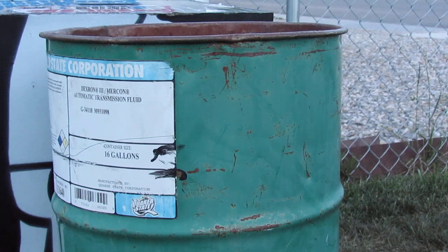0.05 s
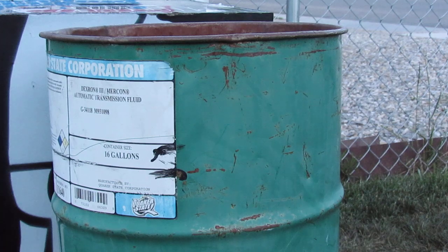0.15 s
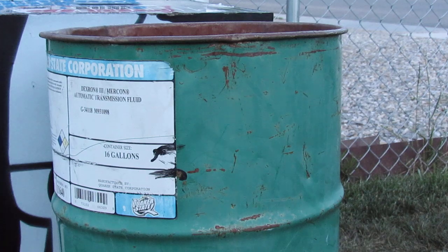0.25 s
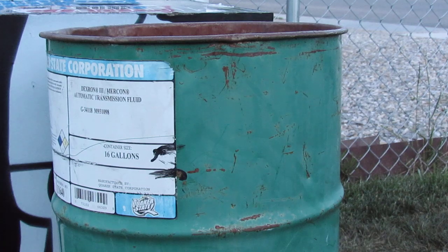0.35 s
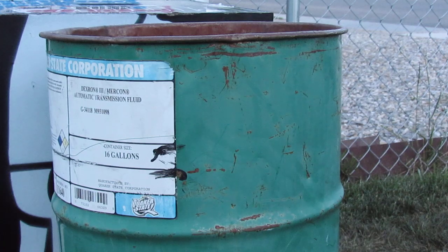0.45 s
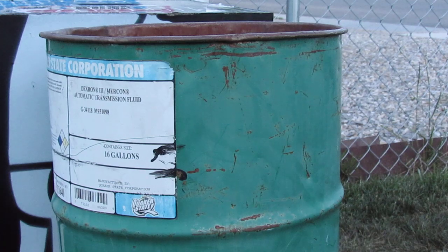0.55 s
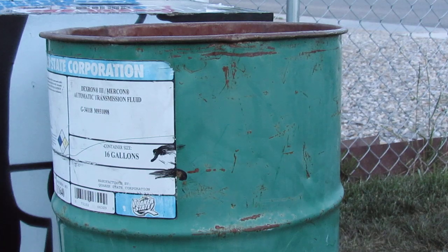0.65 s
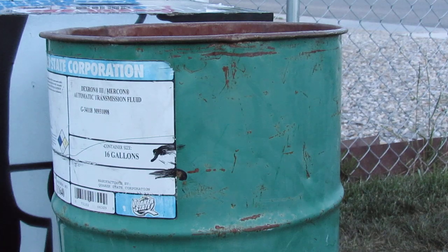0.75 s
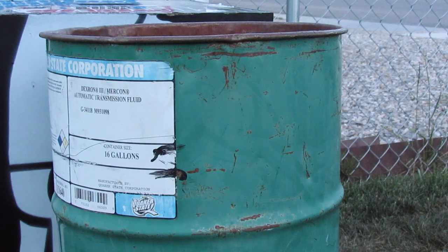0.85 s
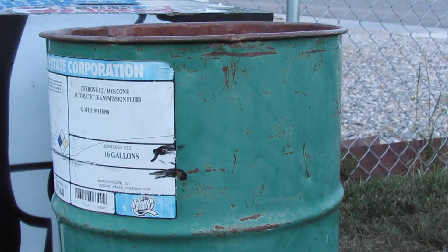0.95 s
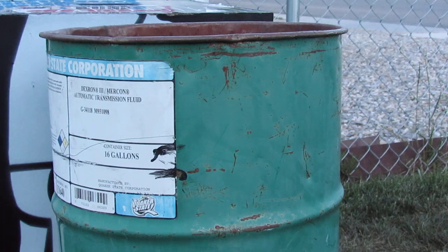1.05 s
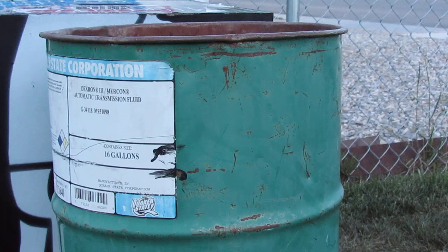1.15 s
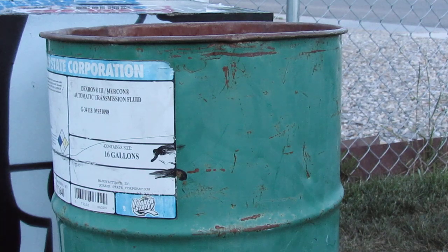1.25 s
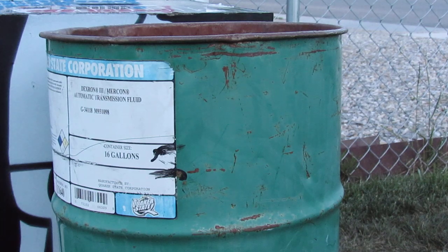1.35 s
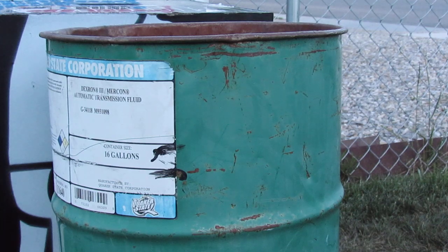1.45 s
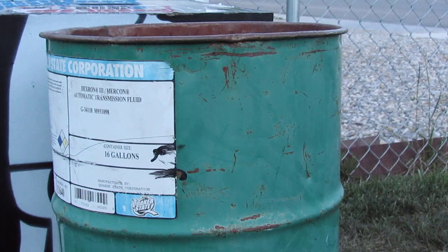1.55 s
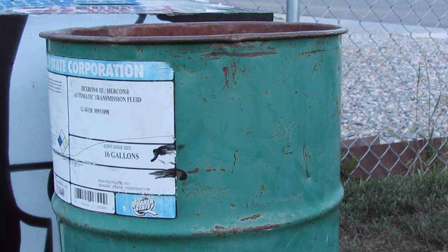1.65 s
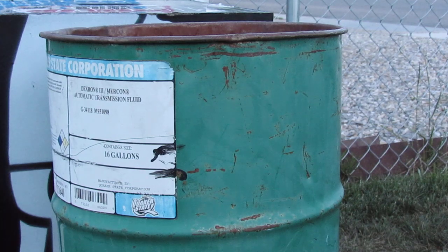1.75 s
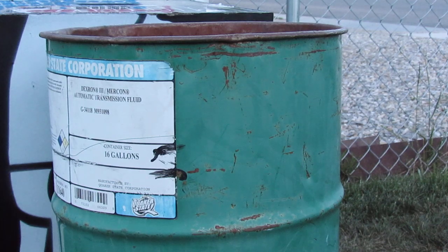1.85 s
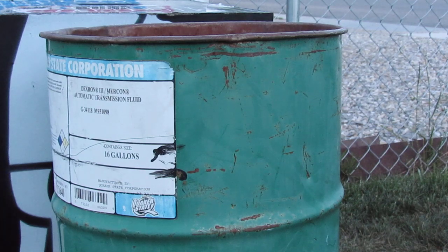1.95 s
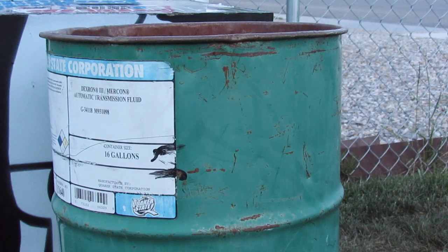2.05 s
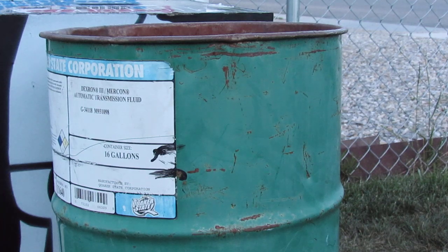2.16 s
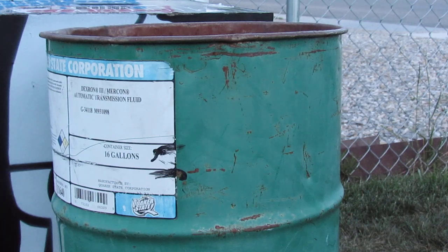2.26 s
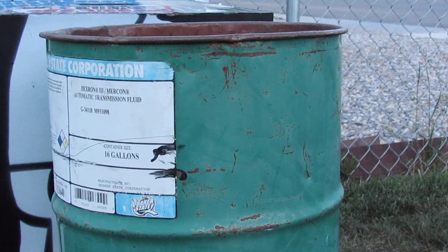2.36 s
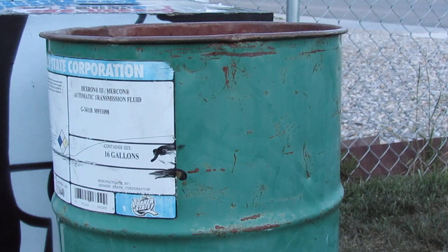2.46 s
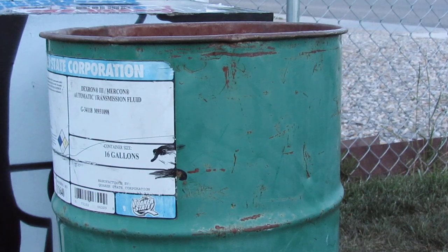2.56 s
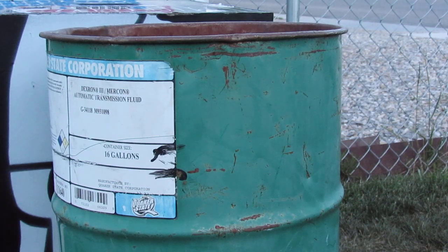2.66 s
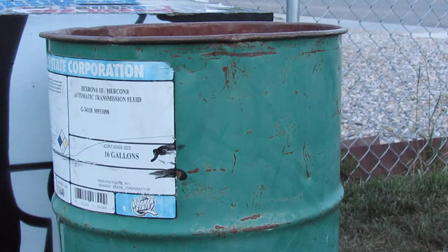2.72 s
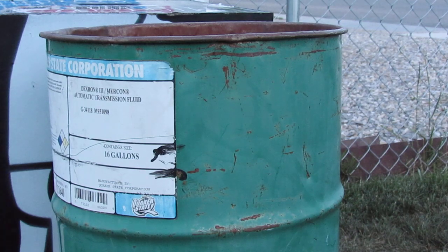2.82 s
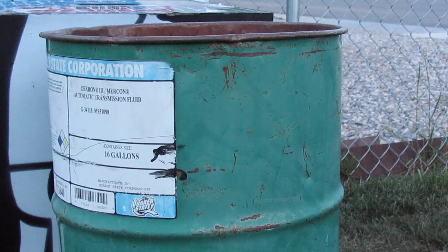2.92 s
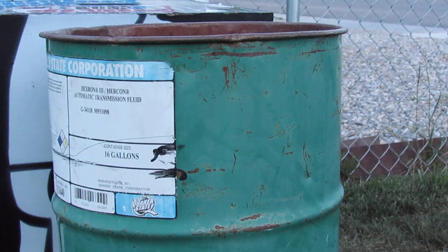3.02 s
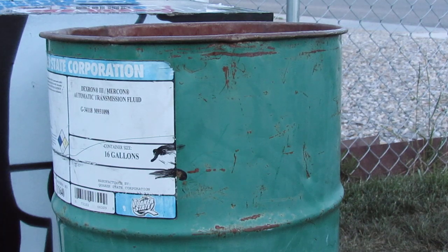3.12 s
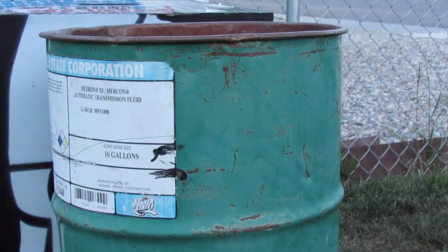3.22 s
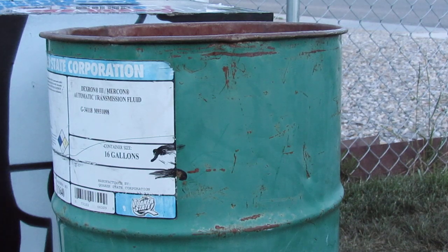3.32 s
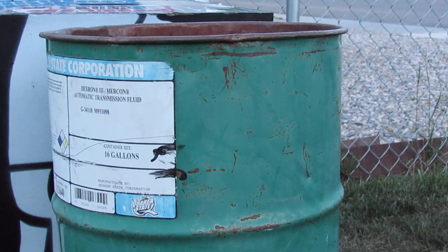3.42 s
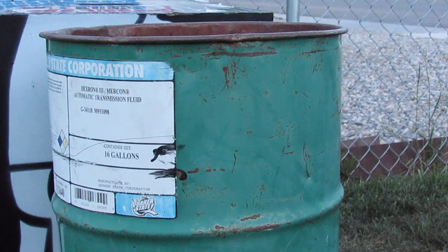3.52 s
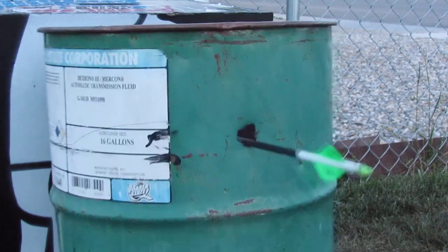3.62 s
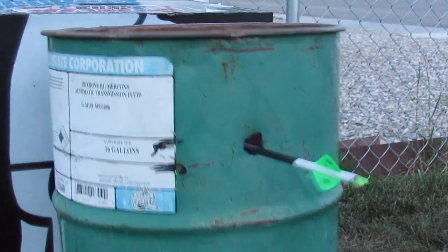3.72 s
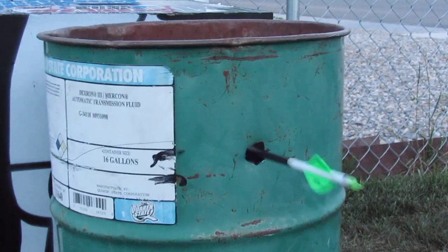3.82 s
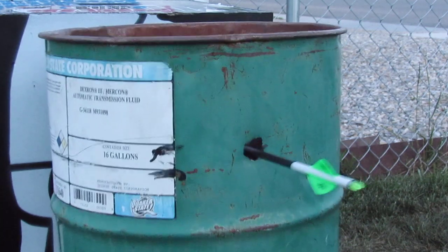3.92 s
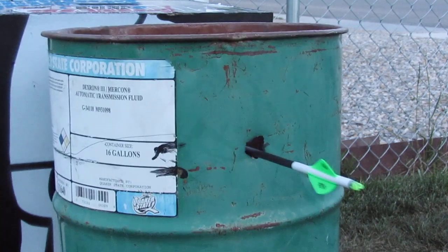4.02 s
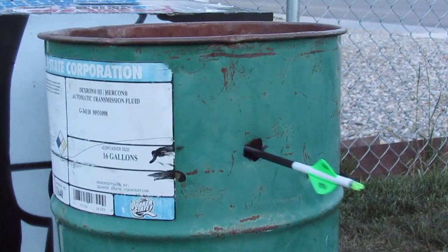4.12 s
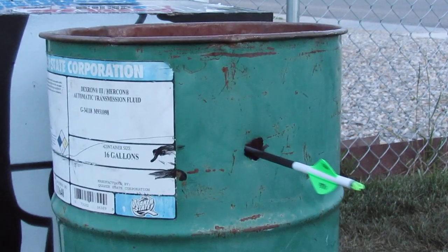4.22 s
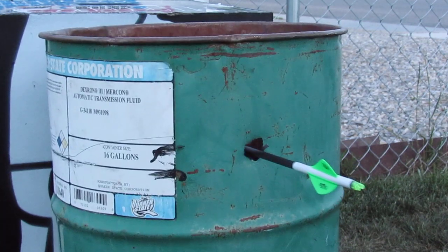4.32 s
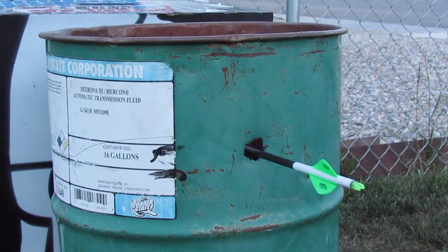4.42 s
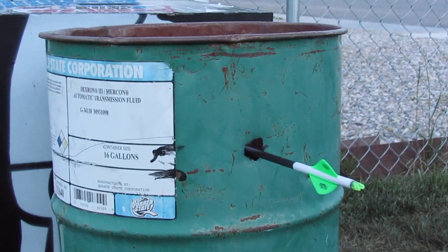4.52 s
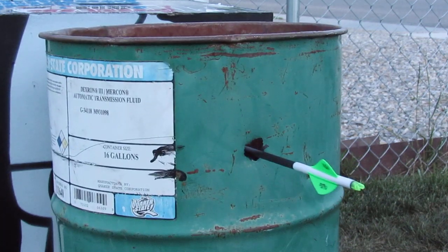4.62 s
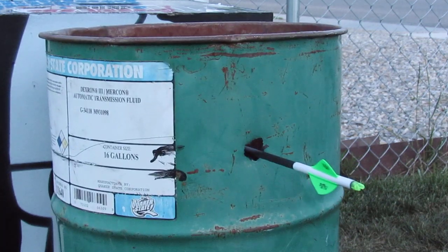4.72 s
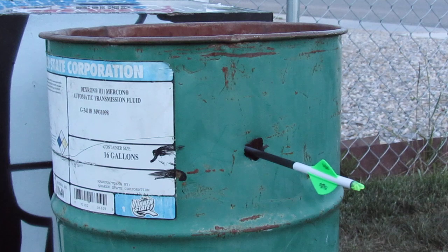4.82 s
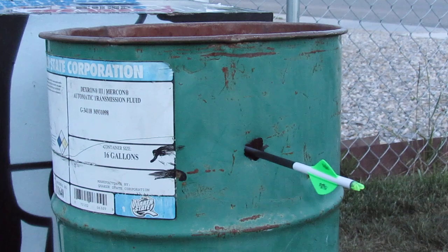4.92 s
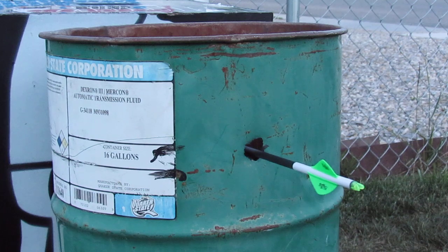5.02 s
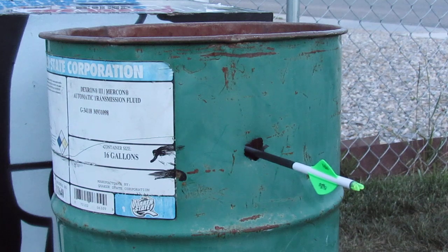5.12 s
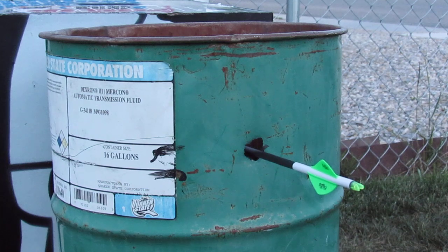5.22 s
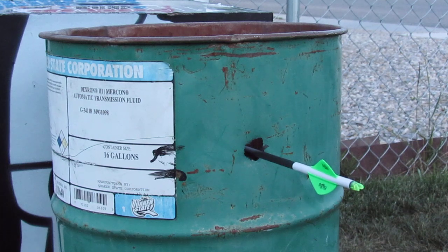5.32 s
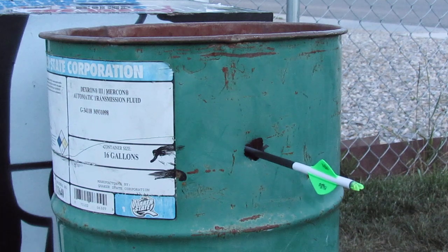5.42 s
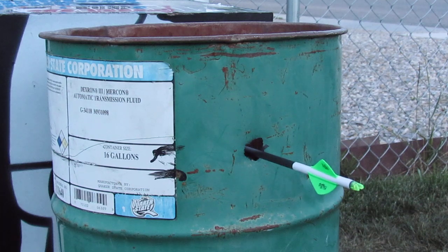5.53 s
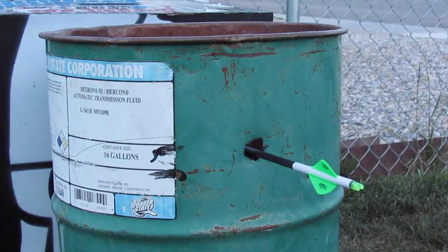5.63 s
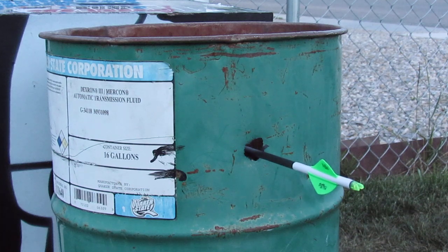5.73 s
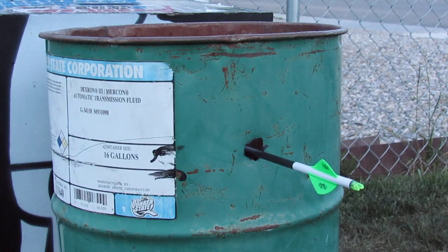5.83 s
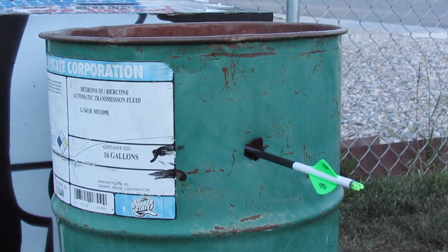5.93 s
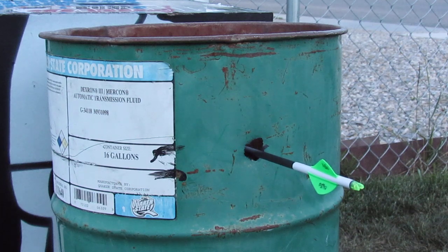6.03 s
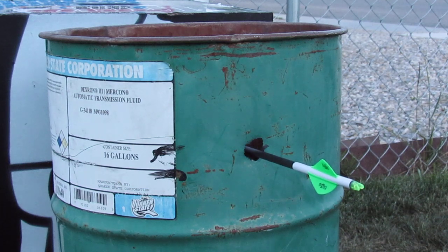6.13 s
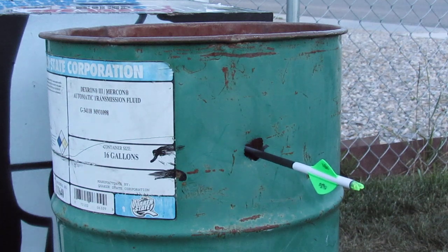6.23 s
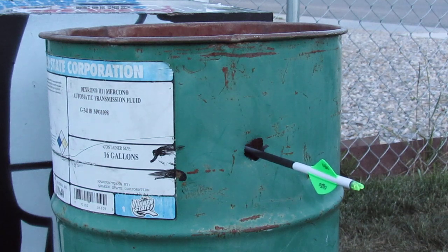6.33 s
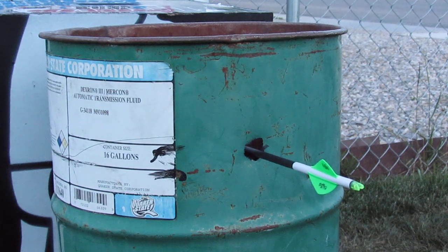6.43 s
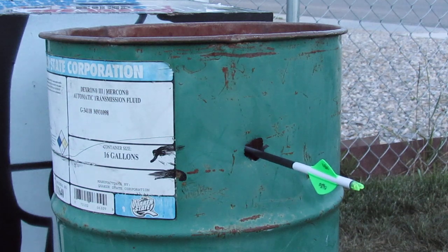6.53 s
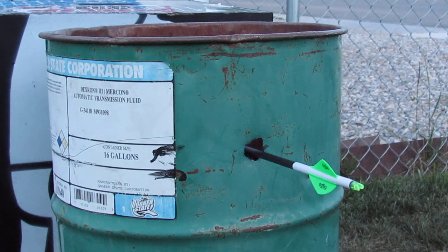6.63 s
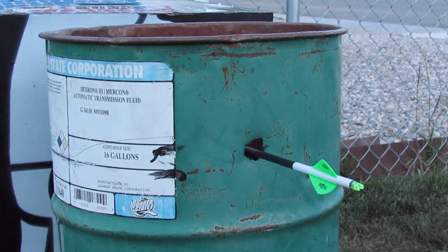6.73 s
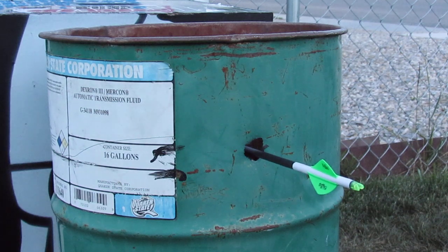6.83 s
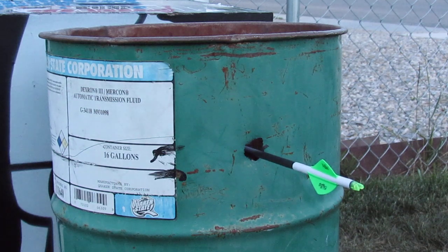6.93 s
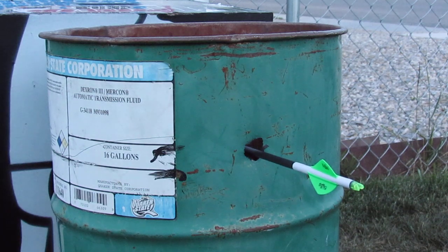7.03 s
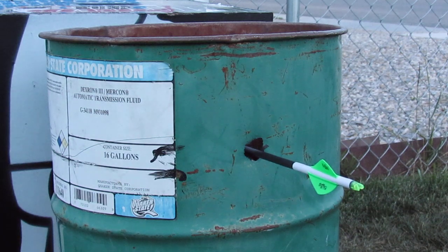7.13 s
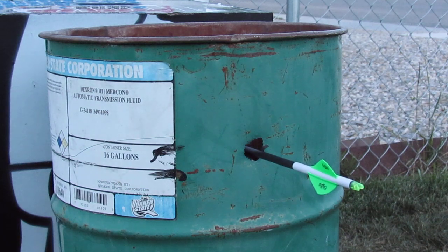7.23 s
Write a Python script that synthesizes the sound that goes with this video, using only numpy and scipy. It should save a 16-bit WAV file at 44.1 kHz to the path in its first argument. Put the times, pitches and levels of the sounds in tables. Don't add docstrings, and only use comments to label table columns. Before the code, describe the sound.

From 0 s a quiet outdoor yard: dull distant traffic and engine hum, a fast high cricket trill that gradually softens, and small high bird notes. A sharp rising whip call comes at 1.0 s, a thin buzzy call at 1.1-1.5 s, a louder, hoarser buzz at 1.8-2.2 s, then falling chirps. Small dry ticks at about 3 s. At 3.53 s a faint bow-release tick, then at 3.55 s an arrow bursts through an empty steel drum: an enormous bright, hollow bang, scrape and several rapid blows until 3.7 s. Echoes slap back to about 4.1 s while the metal rings in many clashing tones, treble dying first, low hum lingering past 5 s. The ambience is ducked, then creeps back: passing cars around 5 s, brief bird chirps at 5.5 s, a dull knock at 6.2 s, grass rustling closer with clicks until 7.3 s.

```python
import sys
import numpy as np
from scipy import signal
from scipy.io import wavfile

SR = 44100
rng = np.random.default_rng(int(sys.argv[2]) if len(sys.argv) > 2 else 0)


def to_linear_factor(level_db):
    exponent = np.asarray(level_db, float) / 20
    return 10 ** exponent


def materialize(psi):
    bounded = np.clip(np.atleast_2d(psi).T, -1, 1)
    quanta = np.round(bounded * 32767).astype(np.int16)
    wavfile.write(sys.argv[1], SR, quanta)


N = 320603

# frequency in Hz, density in dB per Hz.
TRAFFIC = [(15, -50), (25, -13.5), (59, -13.5), (80, 3), (140, -4), (204, -8), (260, -1.5), (340, -10),
           (649, -7.5), (763, -2.5), (1310, -4.5), (4760, -25.5), (6060, -17), (7120, -26), (15600, -31)]
# frequency in Hz, likeness from -1 to 1.
AIR_ALIKE = [(60, 0.94), (180, 0.93), (550, 0.88), (1650, 0.63), (4970, 0.13), (15000, 0.04)]
# time in seconds, lift in dB.
PASSES = [
    (.5, 0.9),
    (5.0, 3.9),
    (6.55, 2.2),
    (7.15, 2),
]
# frequency in Hz, width in Hz, level in dB.
MOTOR = [(100, 31, -64), (149, 20, -61), (202, 87, -75.5), (258, 120, -64)]
# time in seconds, level in dB.
CRICKET = [
    (0, -51.5),
    (1.2, -55.5),
    (2, -57),
    (2.5, -63),
    (5.2, -68.5),
    (6.2, -71.5),
    (7.27, -85),
]
# time in seconds, frequency in Hz.
CRICKET_HZ = [
    (0, 6050),
    (3.3, 5976),
    (4.2, 5740),
    (7.27, 5836),
]

# start in seconds, length in seconds, frequency in Hz, width in Hz, level in dB.
RASPS = [(.001, 0.22, 11300, 4000, -60), (.48, 0.23, 7350, 1300, -58.5), (1.25, 0.19, 3690, 400, -57.5),
         (1.035, .085, 5330, 650, -51), (1.085, .06, 9700, 1200, -60), (1.085, .09, 3610, 1200, -57),
         (5.59, .13, 7340, 500, -63), (3.075, .04, 8100, 400, -64), (3.072, 0.052, 4670, 1200, -54.5),
         (3.1, .1, 6500, 900, -62), (4.48, 0.048, 3870, 1620, -68.5), (4.485, .03, 7820, 902, -71),
         (4.54, 0.063, 6200, 902, -75), (5.495, 0.028, 2400, 1200, -59), (5.505, 0.067, 7600, 795, -58),
         (5.558, 0.075, 5300, 1300, -55), (5.585, .08, 6600, 1200, -59), (5.66, 0.24, 932, 40, -59.5),
         (6.285, 0.32, 2674, 2370, -63)]
# start in seconds, length in seconds, start in Hz, end in Hz, level in dB.
SLURS = [
    (.3, 0.31, 6500, 7600, -59),
    (2.854, 0.13, 1900, 2930, -58),
    (5.548, 0.036, 4600, 5960, -51),
    (5.572, .014, 5900, 7300, -56),
    (6.805, 0.037, 4300, 5070, -56.5),
]
# start in seconds, length in seconds, start in Hz, level in dB.
SEEPS = [
    (.96, .12, 9400, -59),
    (2.73, .06, 9900, -66),
    (2.819, 0.15, 9360, -57.5),
    (5.512, .045, 8800, -59),
]
# start in seconds, start in Hz, held note in Hz, level in dB.
WHIPS = [
    (1.022, 2900, 5700, -43),
    (5.577, 7750, 7430, -48),
]
# time in seconds, level in dB, frequency in Hz, hoarse share from 0 to 1.
THIN_BUZZ = [
    (1.075, -64, 8500, 0.2),
    (1.091, -47, 8350, 0.3),
    (1.107, -45.5, 8550, 0.5),
    (1.185, -48, 8600, 0.04),
    (1.3, -42, 8560, 0.01),
    (1.387, -39, 8520, 0.13),
    (1.481, -63, 8240, 0.5),
    (1.52, -68, 8330, 0.2),
]
# time in seconds, level in dB, frequency in Hz, hoarse share from 0 to 1.
BROAD_BUZZ = [
    (1.8, -73, 8400, 0.85),
    (1.81, -50, 8640, 0.66),
    (1.824, -41.5, 8540, 0.33),
    (1.89, -35, 8500, 0.23),
    (2.001, -38, 8230, 0.66),
    (2.078, -35, 8740, 0.25),
    (2.24, -69.5, 8950, 0.73),
]
THIN_SIDES = 1.082, .325, [(3620, 450, -58), (9900, 1500, -64)]
BROAD_SIDES = 1.82, 0.32, [(3350, 1300, -60), (4900, 790, -51.5), (6500, 1700, -54), (10800, 2400, -59),
               (13300, 1600, -57.5)]
# start in seconds, length in seconds, start in Hz, level in dB.
FALLS = [
    (1.56, 0.094, 5100, -60.5),
    (1.68, .07, 4330, -61),
    (2.33, .085, 5200, -61.5),
    (2.43, 0.052, 4000, -59),
]
# start in seconds, length in seconds, frequency in Hz, level in dB.
PIPS = [
    (4.94, 0.17, 2235, -61.5),
    (5.288, 0.036, 6380, -60),
    (5.377, .08, 5450, -68.5),
    (5.75, 0.03, 2860, -62.5),
]
# time in seconds, peak level in dB, frequency in Hz, left over right in dB.
TICKS = [(2.9547, -43, 2810, 3.0), (3.029, -42, 2800, 3), (3.070, -38, 4200, 11), (4.417, -58, 2950, 0.5),
         (4.4822, -54.5, 3620, 5), (4.7557, -58, 2700, -2.5), (4.8074, -55, 4100, 0.0),
         (5.0196, -43, 2880, 4), (5.247, -42, 3410, 12), (5.5091, -40, 2340, 17), (6.6795, -48, 2680, 1.5),
         (6.7425, -41, 3400, 4), (6.82, -37, 5030, -7), (6.821, -38, 2900, -4), (1.028, -43, 7450, 4),
         (1.705, -47, 3600, 3), (2.255, -52, 11500, -6), (6.8744, -83, 3130, -5),
         (7.0058, -31.5, 9550, -1.0), (7.0393, -40, 4900, 2)]
# time in seconds, level in dB, frequency in Hz, 60 dB decay in seconds.
KNOCK = (6.2215, -35, 430, 0.016)

# time in seconds, frequency in Hz, width in Hz, level in dB.
RELEASE = [
    (3.5337, 10500, 6000, -26.5),
    (3.5335, 2400, 3010, -34.5),
]
# start in seconds, length in seconds, frequency in Hz, width in Hz, level in dB.
SCRAPES = [(3.557, .022, 1150, 800, -22.5), (3.553, 0.045, 10650, 7200, -23.5),
           (3.563, 0.0054, 11000, 4000, -16.5), (3.5385, 0.002, 10000, 2000, -31.5),
           (3.5742, 0.0036, 6330, 2000, -14), (3.5742, 0.0032, 11470, 2700, -15), (3.9, 3.2, 53, 27, -66.5),
           (4.15, 0.28, 4000, 3300, -76), (4.147, .15, 5300, 350, -77), (4.146, .012, 4600, 2900, -68),
           (4.147, .05, 8500, 300, -80)]
# frequency in Hz, level in dB.
RING_RETURNS = [(1585, -62), (1655, -62), (1930, -64), (1975, -66), (2388, -64), (2575, -68), (2696, -67),
                (2860, -66), (3116, -76), (2490, -69)]

# time in seconds, level in dB, frequency in Hz, decay in seconds.
THUMP = (3.5, -9, 48, .11)
PUNCH = (3.55088, 17, 1900, .0022)
# time in seconds, level in dB, brightness in dB per octave,
# share of the decay time, rise in seconds.
CONTACTS = [
    (3.549, 6.5, -3.5, 1.9, 0.0047),
    (3.5713, 18.5, 5, 1.19, 0.002),
    (3.598, 19.5, 1, 0.79, 0.0087),
    (3.625, 8, -2, 0.61, .01),
    (3.654, -10.5, -8, 0.37, 0.005),
    (3.69, -17.5, -6, 1.3, 0.036),
]
# time in seconds, level in dB, brightness in dB per octave.
ECHOES = [
    (3.706, -14, 2),
    (3.745, -30, 5),
    (3.772, -25.5, 5),
    (3.855, -31.5, 1.5),
    (3.886, -19, -1),
    (3.9967, -25.5, 0),
    (4.03, -33.5, 1),
    (4.054, -28, 1),
    (4.145, -36, -4.5),
]
# frequency in Hz, density in dB per Hz.
CRASH = [(35, -58), (60, -27), (120, -7.5), (192, -12), (351, -9.5), (423, -7.5), (829, -0.5), (1320, -5),
         (1450, -1.5), (5840, -4.5), (15500, -10.5)]
# frequency in Hz, 60 dB decay in seconds.
CRASH_T60 = [(100, 0.064), (170, 0.15), (260, 0.2), (340, 0.36), (550, 0.77), (750, 0.5), (1500, 0.53),
             (3000, 0.34), (6000, 0.23), (12000, 0.08)]
# frequency in Hz, likeness from -1 to 1.
CRASH_ALIKE = [(60, 0.9), (240, 0.96), (950, 1), (2000, 0.82), (3770, 0.75), (9000, 0.36), (15000, 0.014)]
# frequency in Hz, level in dB, 60 dB decay in seconds.
LOWER_WALL = [(94.7, -18, 4.26), (110.4, -34, 3.63), (176.6, -39, 6.0), (188.4, -16, 3.13),
              (202.0, -12, 2.15), (212.8, -13, 2.25), (294.1, -34, 1.94), (312.2, -17, 1.96),
              (318.8, -20, 2.85), (338.5, -9, 2.32), (362.4, -19, 2.48), (392.5, -21, 2.8),
              (406.4, -19, 2.32), (419.7, -7, 1.5), (425.8, -14, 1.73), (449.5, -8, 2.14),
              (456.9, -11, 2.15), (466.7, -22, 2.91), (476.9, -16, 2.37)]
UPPER_WALL = [(485.8, -18, 1.96), (495.4, -22, 1.91), (507.7, -21, 2.77), (516.3, -32, 2.8),
              (536.6, -19, 2.8), (550.9, -10, 1.18), (557.8, -18, 1.15), (573.3, -12, 1.92),
              (584.3, -11, 1.02), (601.1, -9, 1.46), (615.2, -27, 1.88), (627.5, -8.5, 2.21),
              (639.4, -20, 2.08), (653.6, -9, 1.25), (665.0, -18, 1.4), (671.1, -13, 1.74),
              (679.1, -6, 1.14), (685.7, -22, 1.59), (698.1, -3, 1.09), (704.9, -16, 1.55),
              (714.0, -10, 0.94), (723.4, -17, 1.44)]
END_PLATES = [(745.3, -2, 1.15), (774.9, -6.5, 1.94), (795.6, -11, 1.14), (810.5, -14, 1.46),
              (824.5, -7, 1.07), (838.3, -5, 1.24), (855.3, -17, 1.18), (869.4, -12, 1.04),
              (896.5, -2, 0.73), (924.9, -18, 1.62), (941.6, -11, 0.98), (953.9, -23, 1.57),
              (985.8, -4, 0.88), (1021.6, -7, 1.47), (1047.7, -20, 1.17), (1058.3, -13, 1.14),
              (1078.2, -16, 1.08), (1119.1, -12, 0.95), (1152.0, -13, 1.3), (1168.0, -19, 1.28),
              (1187.2, -17, 1.26), (1201.8, -2, 0.79), (1231.6, -21, 1.22), (1243.5, -7, 0.85),
              (1254.0, -11, 1.1), (1294.9, -13, 1.16), (1317.7, -10, 0.8), (1331.0, -17, 0.97),
              (1386.7, -8, 1.03), (1400.3, -10, 0.79), (1422.4, -3, 0.85), (1445.2, -22, 0.91),
              (1468.6, -14, 1.02), (1477.5, -9, 1.02), (1518.4, -5, 0.99), (1543.2, 0, 0.71),
              (1552.9, -8, 0.97), (1628.6, -10, 0.92), (1646.3, -11, 0.88), (1660.6, -12, 0.9),
              (1677.6, -10, 0.89), (1714.7, -11, 0.87), (1735.1, -13, 0.86), (1763.7, -11, 0.78),
              (1840.8, -13, 0.81), (1857.9, 3, 0.81), (1870.4, -11, 0.8), (1879.4, -9, 0.8),
              (1893.6, -6, 0.73), (1958.8, -6, 0.77), (1972.5, -13, 0.76), (2104.7, -15, 0.71),
              (2136.5, -6, 0.57), (2148.9, 1, 0.54), (2163.8, -15, 0.69), (2175.5, -11, 0.69),
              (2207.0, -8, 0.68), (2225.2, -14, 0.67)]
RIM = [(2282.5, 1, 0.4), (2344.6, -9, 0.64), (2387.0, -5, 0.62), (2431.1, -4, 0.62), (2457.6, -9, 0.52),
       (2477.2, -7, 0.49), (2517.9, 1, 0.4), (2612.0, -4, 0.52), (2650.9, -3, 0.43), (2678.7, -12, 0.55),
       (2696.7, 3, 0.36), (2743.1, -9, 0.45), (2763.1, -10, 0.45), (2790.9, 0, 0.39), (2812.6, -7, 0.4),
       (2839.2, -12, 0.5), (2869.1, -8, 0.48), (2952.9, -14, 0.44), (3020.4, -2, 0.38), (3041.4, -13, 0.49),
       (3059.4, -12, 0.49), (3096.7, -5, 0.35), (3211.3, -10, 0.47), (3264.1, -21, 0.45), (3309.2, 1, 0.32),
       (3347.7, -11, 0.45), (3421.6, 1, 0.31), (3440.4, -5, 0.44), (3461.5, -2, 0.37), (3500.0, -9, 0.43)]
TORN_PANEL = [(743.1, -1, 0.72), (777.4, 0, 0.63), (853.6, 9, 0.59), (997.0, 3, 0.5), (1015.4, 4, 0.76),
              (1055.8, -4, 0.47), (1101.6, 1, 0.45), (1130.2, 1, 0.44), (1246.9, -7, 1.2),
              (1272.3, -6, 0.72), (1308.6, -9, 0.84), (1418.3, 5, 0.5), (1448.1, 2, 0.38),
              (1473.2, -5, 0.72), (1505.1, -7, 0.68), (1548.7, -6, 0.97), (1598.8, 6, 0.32),
              (1650.1, 3, 0.57), (1735.6, 2, 0.32), (1775.3, 3, 0.32), (1847.0, 2, 0.32), (1948.1, 7, 0.36),
              (1984.8, 2, 0.38), (2095.8, -2, 0.35), (2150.6, 1, 0.7), (2270.7, 2, 0.3)]
TORN_EDGE = [(3671.7, -5, 0.41), (3772.3, -1, 0.4), (3837.5, -1, 0.34), (3994.7, -5, 0.34),
             (4194.9, -6, 0.36), (4337.8, -3, 0.35), (4402.5, 1, 0.25), (4469.8, -3, 0.34),
             (4533.9, -1, 0.27), (4598.3, -8, 0.28), (4742.4, 2, 0.26), (4857.8, -6, 0.31),
             (4945.6, -3, 0.28), (5042.8, 1, 0.24), (5140.7, -3, 0.26), (5202.8, 0, 0.25),
             (5264.9, 1, 0.21), (5397.8, -6, 0.28), (5466.4, 10, 0.15), (5577.8, -2, 0.25),
             (5670.8, -1, 0.23), (5771.6, 3, 0.21), (5840.5, 1, 0.22), (6003.2, -3, 0.24),
             (6054.7, 9, 0.14), (6115.9, -1, 0.18), (6216.7, -8, 0.24), (6361.9, -4, 0.24),
             (6424.3, 0, 0.23), (6493.6, -2, 0.23), (6650.4, -9, 0.23), (6691.8, 3, 0.16),
             (6732.2, -2, 0.22), (6779.4, 6, 0.17), (6864.4, -4, 0.22), (6977.3, -3, 0.21)]
# frequency in Hz, seconds to the swell, seconds from null to null.
TWINS = [(627.5, .67, 1.35), (698.1, .7, 1.4), (774.9, 0, 2.4), (1857.9, .9, 2.0)]

# time in
# seconds, level in dB.
RUSTLE_FLOOR = [
    (4.45, -93),
    (4.85, -80),
    (7.27, -68),
]
# peak time in seconds, level in dB, rise in seconds.
STIRS = [(5.03, -69, 0.019), (5.22, -71, 0.105), (5.55, -69, 0.097), (5.72, -72.5, 0.035),
         (5.93, -66.5, 0.083), (6.16, -71.5, .05), (6.52, -60.5, 0.24), (6.79, -61, 0.025),
         (7.002, -65, 0.0092), (7.11, -59.5, 0.086), (7.179, -58, 0.025)]
# frequency in Hz, density in dB per Hz.
RUSTLE_TONE = [(1180, -24.5), (2000, -11.5), (4440, -5.5), (4920, -9), (6650, -8.5), (11200, -7),
               (15600, -32)]

PORT_LAG_S = 48e-6
FAR_WALL_S = 3.574


def rms_one(x):
    return x / np.sqrt(np.mean(np.abs(x) ** 2) + 1e-20)


def in_time(rows):
    return to_linear_factor(np.interp(np.arange(N) / SR, *np.transpose(rows)))


def at_hz(points, hz):
    points = np.array(points)
    return np.interp(np.log(hz), np.log(np.maximum(points[:, 0], 1)), points[:, 1])


def pan(db):
    return to_linear_factor(db * np.array([[1], [-1]]))


def drift(rate_hz):
    knot_step = 200
    knots = rng.standard_normal(N // knot_step + 402)
    r = np.exp(-2 * np.pi * rate_hz * knot_step / SR)
    slow = signal.lfilter([1], [1, -2 * r, r * r], knots)[400:]
    return np.interp(np.arange(N) / knot_step, np.arange(len(slow)), rms_one(slow))


def ring(clicks, hz, t60):
    r, w = to_linear_factor(-60 / (t60 * SR)), 2 * np.pi * hz / SR
    return signal.lfilter([0, np.sin(w)], [1, -2 * r * np.cos(w), r * r], clicks + 1e-18)


def thud(s, db, hz, t60):
    click = np.zeros(N)
    click[round(s * SR)] = to_linear_factor(db)
    return ring(click, hz, t60)


def bands(spectrum, likeness, count):
    edges = 25 * 2 ** np.arange(0, 9.6, .5)
    white = rng.standard_normal((2, 2, count))
    for k, (low, high) in enumerate(zip(edges, edges[1:])):
        hz = np.sqrt(low * high)
        sos = signal.butter(2, [low, high], "band", fs=SR, output="sos")
        mid, side = signal.sosfilt(sos, white[k % 2])
        alike = np.clip(at_hz(likeness, hz), -1, 1)
        stereo = np.sqrt(1 + alike) * mid + np.sqrt(1 - alike) * side * [[1], [-1]]
        yield hz, to_linear_factor(at_hz(spectrum, hz)) * stereo


def warble(hz, width_hz, lag_s):
    settle = 1500
    noise = rng.standard_normal((3, len(hz) + settle, 2)) @ [1, 1j]
    sos = signal.butter(3, width_hz / 2, fs=SR, output="sos")
    slow = signal.sosfilt(sos, noise)[:, settle:]
    slow = rms_one(slow[0] + np.clip(hz[0] / 200, .2, .5) * slow[1:])
    phase = 2 * np.pi * (np.cumsum(hz) / SR - hz * lag_s * np.array([[0], [1]]))
    return np.sqrt(2) * np.real(slow * np.exp(1j * phase))


def glides(rows, lag_s):
    out = np.zeros((2, N))
    for s, length, from_hz, to_hz, width_hz, db in rows:
        span = round(s * SR) + np.arange(round(length * SR))
        swell = np.sin(np.pi * np.linspace(0, 1, len(span)) ** .6) ** .5
        hz = np.linspace(from_hz, to_hz, len(span))
        out[:, span] += to_linear_factor(db) * swell * warble(hz, width_hz, lag_s)
    return out


def steady(rows):
    return [(s, length, hz, hz, width_hz, db) for s, length, hz, width_hz, db in rows]


def air(spectrum, patchy_db):
    together = drift(3.2)
    total = 0
    for hz, band in bands(spectrum, AIR_ALIKE, N):
        total = total + band * to_linear_factor(patchy_db * (0.53 * together + drift(11.0)))
    return rms_one(total)


def traffic():
    t, half_width_s = np.arange(N) / SR, 0.11
    lift_db = sum(db * np.exp(-.5 * ((t - s) / half_width_s) ** 2) for s, db in PASSES)
    return to_linear_factor(-47.5) * to_linear_factor(lift_db) * air(TRAFFIC, patchy_db=0.85)


def motor():
    return sum(to_linear_factor(db) * warble(np.full(N, hz), width_hz, 0) for hz, width_hz, db in MOTOR)


def cricket():
    trill_per_s, trill_start_s, lag_s = 24.12, .027, 6e-6
    t = np.arange(N) / SR
    hz = np.interp(t, *np.transpose(CRICKET_HZ))
    stroke = (.5 + .5 * np.cos(2 * np.pi * trill_per_s * (t - trill_start_s))) ** 0.5
    near = rms_one(stroke * to_linear_factor(1.5 * drift(5.0)) * warble(hz, 360, lag_s))
    farther = to_linear_factor(-8.5) * warble(hz + 180, 1200, lag_s)
    return in_time(CRICKET) * (near + farther)


def notes():
    thin_hz, sag_hz_per_s = 230, 3500
    rows = steady(RASPS) + [(s, length, hz, hz, thin_hz, db) for s, length, hz, db in PIPS]
    rows += [(s, length, hz, hz - sag_hz_per_s * length, thin_hz, db) for s, length, hz, db in SEEPS]
    rows += [(s, length, hz, 3400, 550, db) for s, length, hz, db in FALLS]
    for s, length, low, high, db in SLURS:
        rows.append((s, length, low, high, 0.1 * (low + high) / 2, db))
    for s, length, sides in (THIN_SIDES, BROAD_SIDES):
        rows += [(s, length, hz, hz * 1.03, width_hz, db) for hz, width_hz, db in sides]
    return rows


def whips():
    settle_s, climb_s, climb_share = 0.0047, .013, .3
    rise_s, note_s, echo_db_per_s, width_hz = 0.011, 0.037, 186, 240
    out, age = np.zeros((2, N)), np.arange(SR // 4) / SR
    fade = to_linear_factor(-echo_db_per_s * np.maximum(age - note_s, 0))
    swell = np.minimum(age / rise_s, 1) ** 1.4 * fade
    octave_swell = to_linear_factor(-19) * np.minimum(age / rise_s / 2, 1) ** 2 * swell
    short_of_note = (1 - climb_share) * np.exp(-age / settle_s) + climb_share * np.exp(-age / climb_s)
    for s, from_hz, note_hz, db in WHIPS:
        hz = note_hz - (note_hz - from_hz) * short_of_note
        voice = warble(hz, width_hz, PORT_LAG_S)
        voice = voice + octave_swell * warble(2 * hz, width_hz, PORT_LAG_S)
        start = round(s * SR)
        out[:, start:start + len(age)] += to_linear_factor(db) * swell * voice
    return out


def buzzes():
    clear_hz, hoarse_hz = 261, 1310
    out = np.zeros((2, N))
    for rows in (THIN_BUZZ, BROAD_BUZZ):
        s, *columns = np.transpose(rows)
        span = np.arange(round(s[0] * SR), round(s[-1] * SR))
        db, hz, hoarse = (np.interp(span / SR, s, c) for c in columns)
        hoarse = np.clip(hoarse, 0, 1)
        voice = np.sqrt(1 - hoarse) * warble(hz, clear_hz, PORT_LAG_S)
        voice = voice + np.sqrt(hoarse) * warble(hz, hoarse_hz, PORT_LAG_S)
        out[:, span] += to_linear_factor([[6.0], [3.5]]) * to_linear_factor(db) * voice
    return out


def birds():
    return pan(1.5) * (glides(notes(), PORT_LAG_S) + whips()) + buzzes()


def ticks():
    out, age = np.zeros((2, N)), np.arange(1500) / SR
    for s, db, hz, pan_db in TICKS:
        puff = warble(np.full(len(age), hz), 0.82 * hz, 0) * to_linear_factor(-60 * age / 0.05)
        start = round(s * SR)
        out[:, start:start + len(age)] += to_linear_factor(db - 11.5) * pan(pan_db / 2) * puff
    return out + thud(*KNOCK)


def arrow():
    tick_s, hiss_s, hiss_db = 0.0029, 0.015, -7
    rows = [(s, tick_s, hz, width_hz, db) for s, hz, width_hz, db in RELEASE]
    rows += [(s + tick_s, hiss_s, hz, width_hz, db + hiss_db) for s, hz, width_hz, db in RELEASE]
    rows += [(3.99, 0.19, hz, 25, db) for hz, db in RING_RETURNS]
    return glides(steady(rows + SCRAPES), 9e-6)


def lean(hz):
    return pan(-1.4 * np.exp(-(2 * np.log2(hz / 2200)) ** 2))


def crash():
    start, count = int(3.5 * SR), int(1.3 * SR)
    out, t = np.zeros((2, N)), np.arange(count) / SR + 3.5
    yard_t60_s = 0.14
    blows = [(*row, 0, 0) for row in CONTACTS]
    # share of the decay time, rise s, hold s, shortest decay s
    blows += [(*row, 0.93, .002, 0.016, yard_t60_s) for row in ECHOES]
    for hz, band in bands(CRASH, CRASH_ALIKE, count):
        power = 0
        for s, db, tilt, share, rise, hold, least_t60 in blows:
            age = np.maximum(t - s, 0)
            t60 = max(share * at_hz(CRASH_T60, hz), least_t60)
            fall_db = -60 * np.maximum(age - hold, 0) / t60
            level_db = db + tilt * np.log2(hz / 4000) + fall_db
            power = power + to_linear_factor(2 * level_db) * np.minimum(age / rise, 1) ** 2
        out[:, start:start + count] += lean(hz) * band * np.sqrt(power)
    return out


def mode(hz, db, t60, share):
    first = round(FAR_WALL_S * SR)
    click = np.zeros(min(N - first, round(2 * share * t60 * SR)))
    click[0] = to_linear_factor(db) * rng.choice([-1, 1])
    age = np.arange(len(click)) / SR
    longest_s = 1430 / hz
    tone = ring(click, hz, min(share * t60, longest_s)) * np.minimum(age / 0.018, 1)
    for twin_hz, swell_s, beat_s in TWINS:
        if twin_hz == hz:
            tone = tone * np.cos(np.pi * (age - swell_s) / beat_s)
    sides = lean(hz) * pan(rng.normal(0, 0.8))
    lag = round(rng.normal(0, 2.5))
    return sides * [tone, np.roll(tone, lag)]


def modes():
    out, first = np.zeros((2, N)), round(FAR_WALL_S * SR)
    # part, level dB, share of the listed ring time that is used
    parts = ((LOWER_WALL, 1, 1), (UPPER_WALL, 0.5, 1), (END_PLATES, 1, 1),
             (RIM, 0.5, 1), (TORN_PANEL, -1, 0.68), (TORN_EDGE, -1, 1))
    for rows, part_db, share in parts:
        for hz, db, t60 in rows:
            tone = mode(hz, db + part_db, t60, share)
            out[:, first:first + tone.shape[1]] += tone
    return out


def drum():
    rings = modes()
    out = crash() + rings
    for s, db, _ in ECHOES:
        late = round((s - FAR_WALL_S) * SR)
        out[:, late:] += to_linear_factor(db - 19.5) * rings[:, :-late]
    return out + thud(*PUNCH) + thud(*THUMP)


def grass():
    rise_db, fall_db_per_s = 11, 113
    t = np.arange(N) / SR
    power = in_time(RUSTLE_FLOOR) ** 2
    for s, db, rise in STIRS:
        below_db = np.where(t < s, rise_db * (s - t) / rise, fall_db_per_s * (t - s))
        power += to_linear_factor(2 * (db - below_db))
    return np.sqrt(power) * to_linear_factor(8) * air(RUSTLE_TONE, patchy_db=.7)


def gain_control():
    duck_db, bite_s, bite_time_s, hold_until_s, creep_s = -25, 3.547, .0042, 4.216, 0.92
    squeeze_db, from_s, to_s, edge_s = -1.5, 3.67, 4.02, .03
    t = np.arange(N) / SR
    bite = 1 - np.exp(-np.maximum(t - bite_s, 0) / bite_time_s)
    creep = np.exp(-np.maximum(t - hold_until_s, 0) / creep_s)
    squeeze = np.tanh((t - from_s) / edge_s) - np.tanh((t - to_s) / edge_s / 2)
    return to_linear_factor(squeeze_db * squeeze / 2 + duck_db * bite * creep)


def ceiling():
    top, top_settled, settle_from_s, time_s = 1.3, .6, 3.58, .014
    t = np.arange(N) / SR
    return top_settled + (top - top_settled) * np.exp(-np.maximum(t - settle_from_s, 0) / time_s)


def scene():
    far = traffic() + motor() + cricket()
    near = birds() + ticks() + grass() + arrow()
    return drum() + far + near / gain_control()


def band_limit(x):
    return signal.sosfilt(signal.butter(12, 15780, fs=SR, output="sos"), x)


def record(dry):
    heard = signal.sosfilt(signal.butter(2, 14500, fs=SR, output="sos"), dry)
    limited = ceiling() * np.tanh(1.109 * heard * gain_control() / ceiling())
    top_cut = signal.ellip(12, .5, 70, 15790, fs=SR, output="sos")
    mix = signal.sosfilt(top_cut, limited)
    return band_limit(mix)


dry = scene()
out = record(dry)
materialize(out)
```